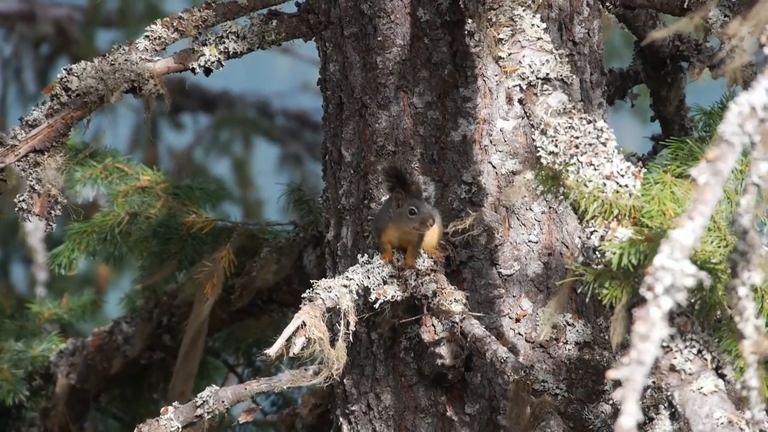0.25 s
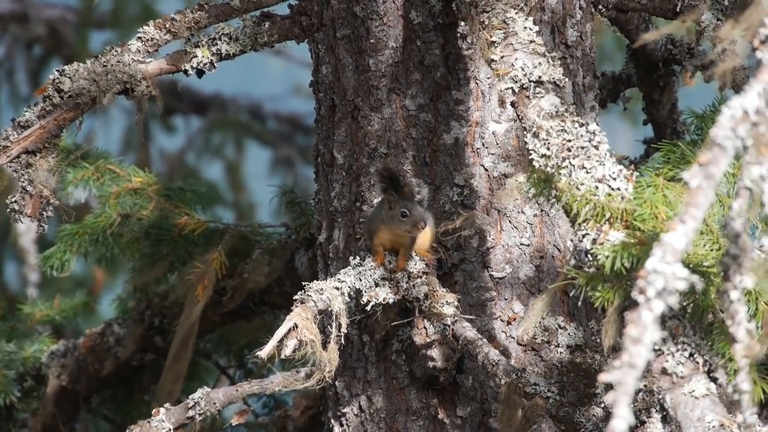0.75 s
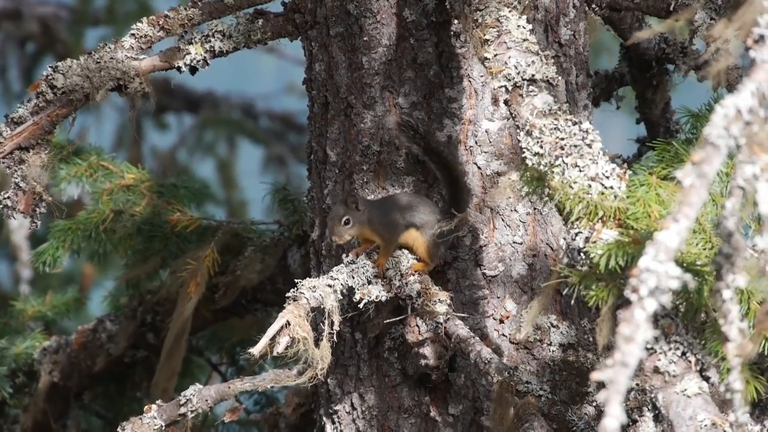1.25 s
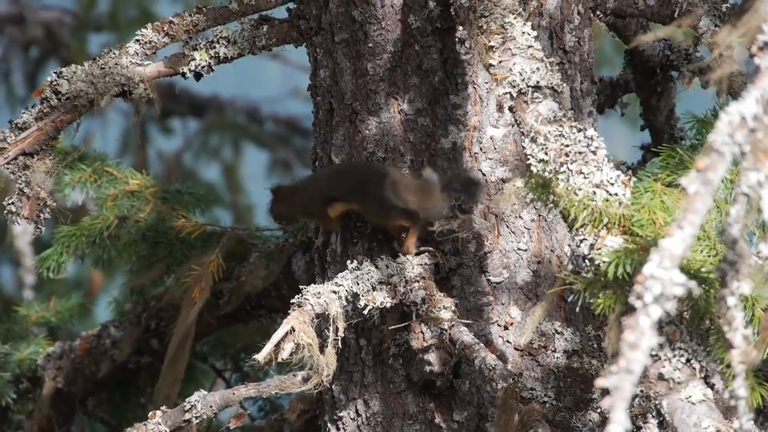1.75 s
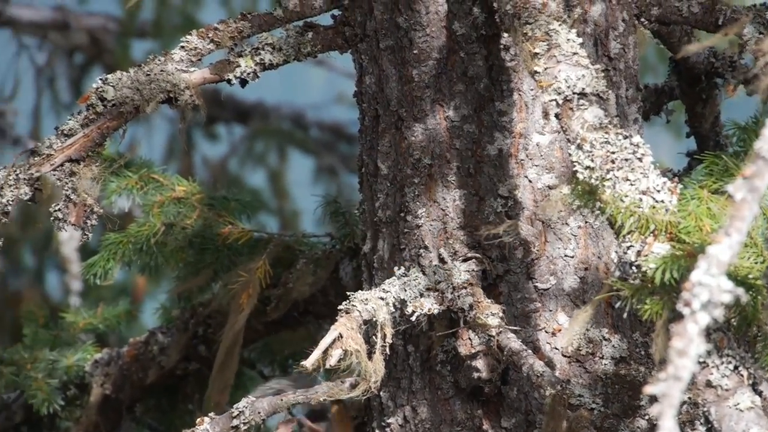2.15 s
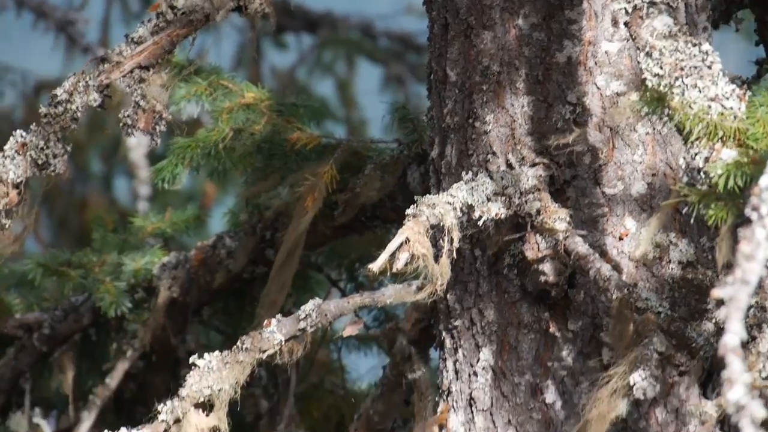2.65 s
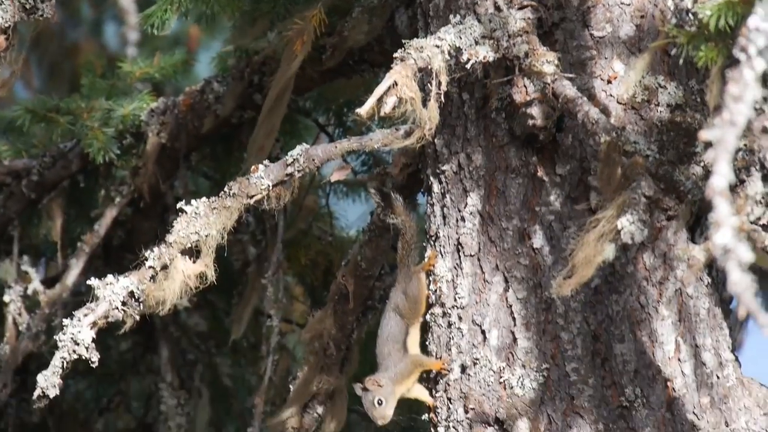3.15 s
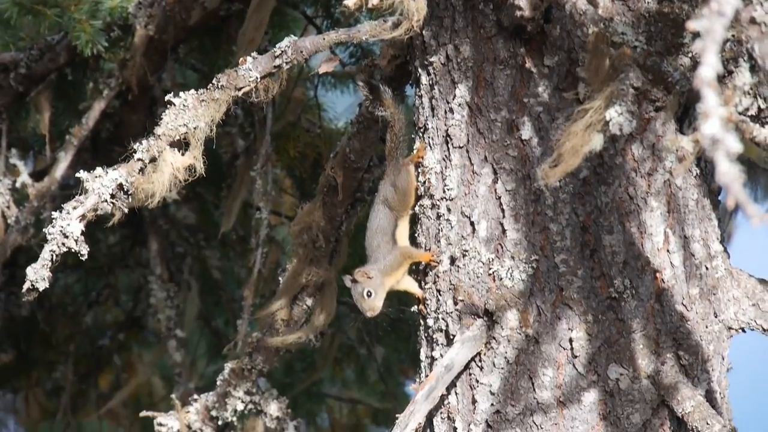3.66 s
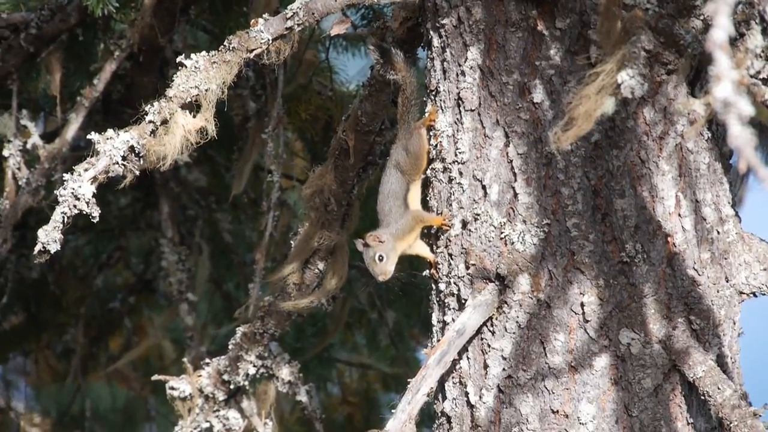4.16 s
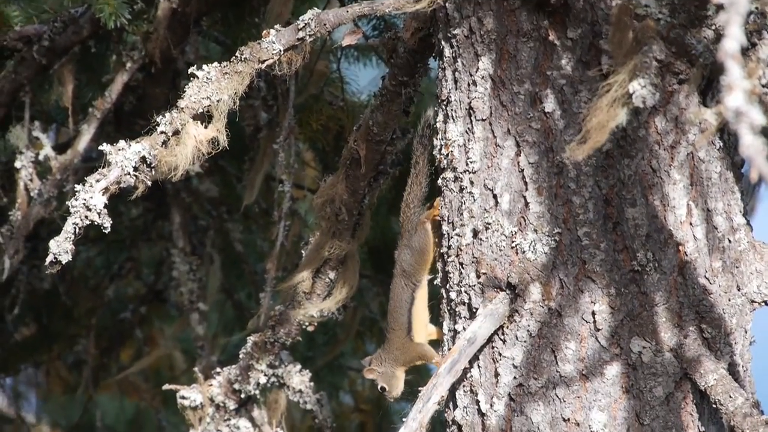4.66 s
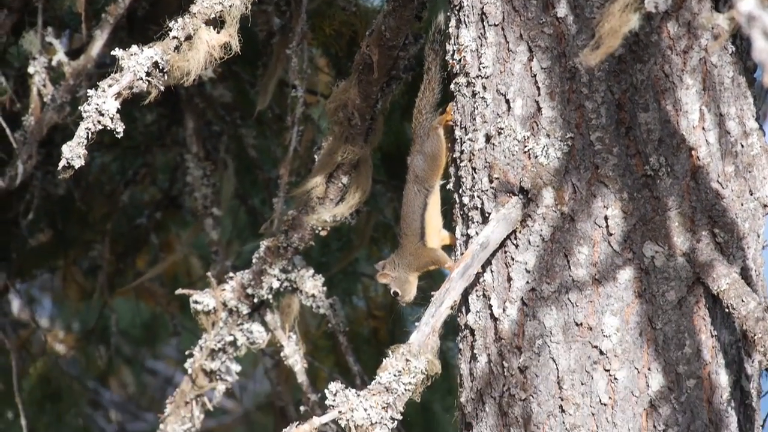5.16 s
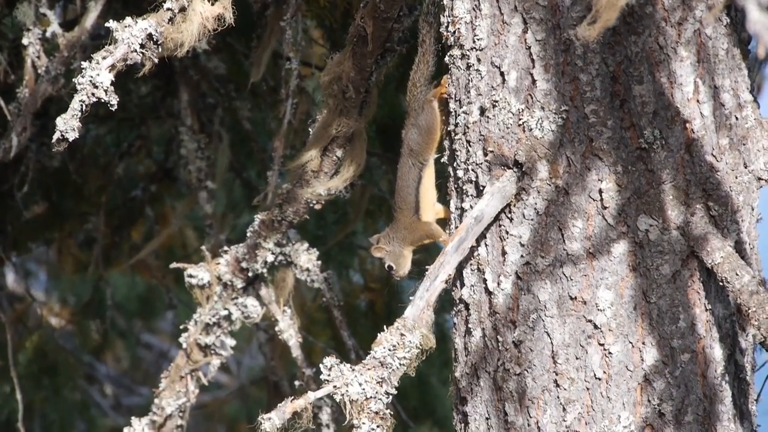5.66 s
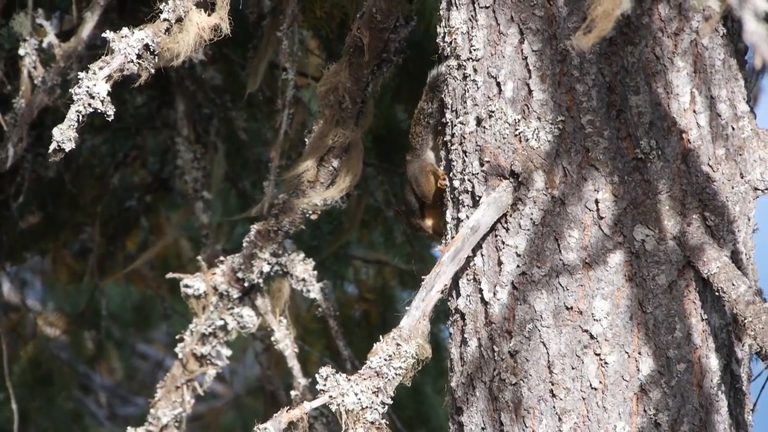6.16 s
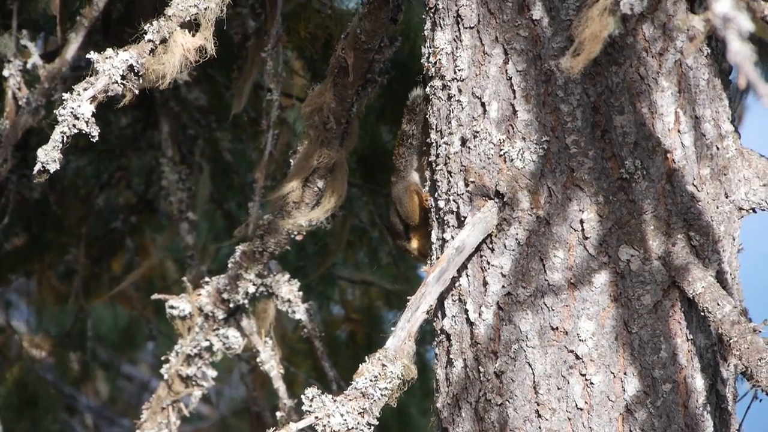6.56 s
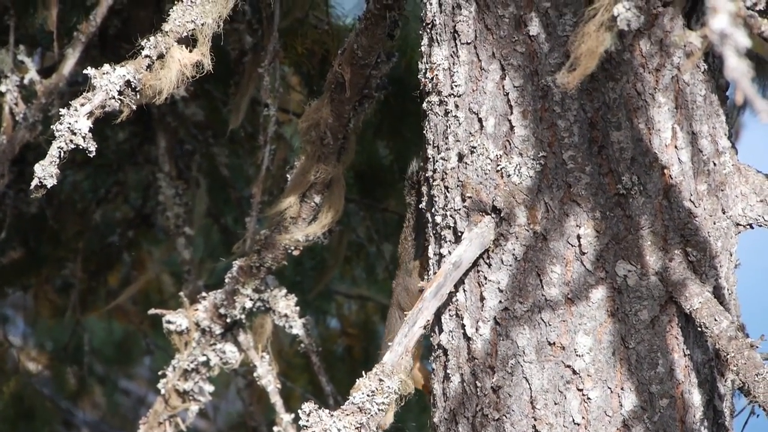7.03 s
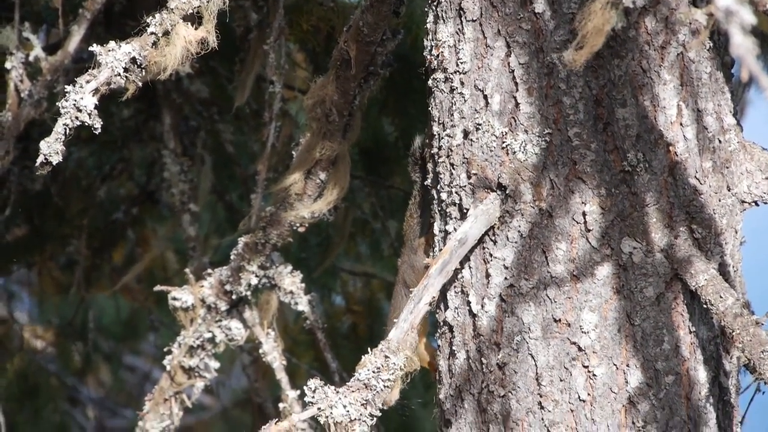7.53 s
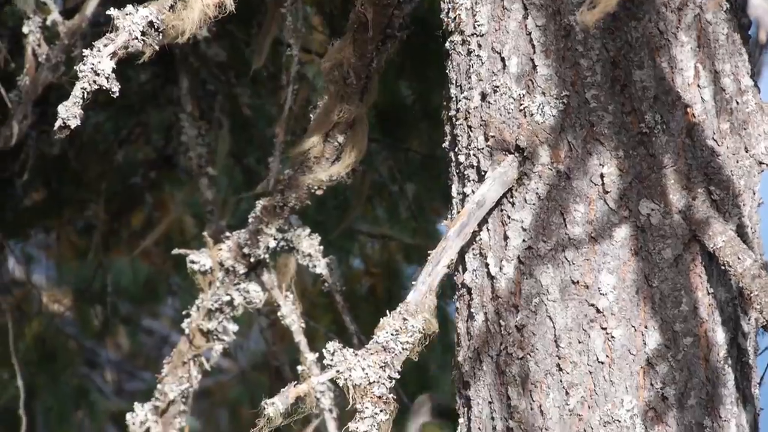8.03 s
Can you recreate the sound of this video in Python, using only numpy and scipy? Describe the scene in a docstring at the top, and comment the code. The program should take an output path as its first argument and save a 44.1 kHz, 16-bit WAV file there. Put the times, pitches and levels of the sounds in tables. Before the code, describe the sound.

A squirrel in a quiet forest gives seven short alarm whistles at uneven intervals. The first is soft and arched, the second a wavering squeal, the next four leap up sharply and slide down, and the last wavers again. Its claws scratch faintly on bark around the first two calls. Light wind buffets the microphone with low thumps, mostly on the right, over a faint steady rush of trees.

```python
"""A squirrel on a conifer trunk gives seven alarm whistles: one soft arch, two that waver at the top,
four that leap up, turn shrill and slide down. Its vocal folds make a nearly pure tone that gains
overtones, rasp and hiss when pressed. Its claws scratch the bark as it turns and jumps, and the trees
scatter a short echo. Eddies of light wind buffet the right microphone port, over the steady faint
rush of the forest."""
import sys
import numpy as np
from scipy import signal
from scipy.fft import rfft, irfft, next_fast_len
from scipy.io import wavfile
from scipy.ndimage import uniform_filter1d, map_coordinates

SR = 44100
rng = np.random.default_rng(int(sys.argv[2]) if len(sys.argv) > 2 else 0)


def wav_record(signal):
    """Record a signal, one row per channel, as 16-bit PCM in the file named by sys.argv[1]."""
    frames = np.transpose(np.atleast_2d(signal))
    bounded = np.clip(frames, -1, 1)
    # unit amplitude maps onto the largest positive 16-bit level
    quanta = np.round(bounded * 32767).astype(np.int16)
    wavfile.write(sys.argv[1], SR, quanta)


N = 365588
BAND_LIMIT_HZ = 15750


def amp(db):
    """Decibels to amplitude ratio."""
    return 10 ** (np.asarray(db) / 20)


def unit(x):
    """Scale to rms 1."""
    return x / np.sqrt(np.mean(x ** 2) + 1e-20)


def along(points, hz):
    """Interpolate (frequency [Hz], value) points on a logarithmic frequency axis."""
    frequencies, values = np.transpose(points)
    return np.interp(np.log(hz + 1), np.log(frequencies + 1), values)


def curves(rows, t):
    """Interpolate each column after the first at the times t."""
    times, *columns = np.transpose(rows)
    return [np.interp(t, times, column) for column in columns]


def wobble(rate, size):
    """Smooth random modulation, rate knots a second."""
    knots = rng.standard_normal(int(size * rate / SR) + 4)
    return map_coordinates(knots, [np.arange(size) * rate / SR])


def swell(t, centre, width):
    """A Gaussian envelope of peak 1."""
    return np.exp(-((t - centre) / width) ** 2 / 2)


def filtered(x, response):
    """Linear filtering: the spectrum of x times a frequency response."""
    size = x.shape[-1]
    padded = next_fast_len(size + 8192)
    return irfft(rfft(x, padded) * response(np.fft.rfftfreq(padded, 1 / SR)), padded)[..., :size]


def coloured(x, spectrum):
    """Filter x by (frequency [Hz], gain [dB]) points."""
    return filtered(x, lambda hz: amp(along(spectrum, hz)))


def noise(spectrum, size):
    """Noise of rms 1, shaped by (frequency [Hz], level [dB]) points."""
    return unit(coloured(rng.standard_normal(size), spectrum))


def add(track, s, sound):
    """Superpose a sound on the track at time s."""
    part = track[max(round(s * SR), 0):][:len(sound)]
    part += sound[:len(part)]


def forest_rush(level_db=-58, waver_db=.4):
    """Partly coherent noise: a steady rush with hollow resonances around 1 kHz."""
    # broad spectrum: (frequency [Hz], relative density [dB])
    spectrum = [(20, -14.5), (90, 4.5), (250, -3.5), (550, -4), (800, -1), (1200, -6.5), (1500, -8),
                (2500, -12), (3600, -11), (4400, -14), (5100, -14), (6500, -19), (10000, -23.5),
                (15500, -28)]
    # resonances: (centre [Hz], width [Hz], lift [dB])
    resonances = [(784, 33, 5.5), (910, 33, 7.5), (1130, 84, 12), (1272, 165, 9), (1947, 215, 5.5),
                  (2990, 520, 2.5)]
    # likeness of left and right: (frequency [Hz], correlation [0-1])
    likeness = [(60, 0.54), (300, 0.31), (600, 0.27), (850, 0.73), (1200, 0.66), (1600, 0.58), (3500, 0.59),
                (7000, 0.48), (15000, 0.2)]

    def mid_and_side(hz):
        lift = sum(db / (1 + (2 * (hz - centre) / width) ** 2) for centre, width, db in resonances)
        angle = np.arccos(along(likeness, hz)) / 2
        return amp(along(spectrum, hz) + lift) * [np.cos(angle), np.sin(angle)]

    mid, side = filtered(rng.standard_normal((2, N)), mid_and_side)
    balance = amp([[.6], [-.6]])  # slightly louder on the left
    return amp(level_db + waver_db * wobble(6, N)) * unit(np.array([mid + side, mid - side])) * balance


def wind(gust_db=1.3, right_db=7, left_db=-11, wake_db=-17, puff_db=5, brightening=1.18):
    """Turbulent pressure: eddies thump on the right port, and weaker ones on the left."""
    # wind strength: (time [s], relative level [dB])
    breeze = [(0.0, -64.5), (0.92, -61.5), (1.34, -81), (1.52, -47), (1.64, -67), (1.85, -43.5),
              (2.22, -70), (2.45, -45), (2.86, -51.5), (3.16, -47.5), (5.33, -60), (5.38, -58), (5.45, -69),
              (5.68, -53.5), (5.82, -67), (6.39, -61.5), (7.57, -60.5), (7.62, -47.5), (7.76, -55),
              (7.97, -44.5), (8.15, -50.5), (8.29, -47.5)]
    # single puffs on the port: (time [s], relative level [dB], frequency [Hz])
    puffs = [(0.724, -45.5, 172), (.83, -37, 169), (1.499, -38, 112), (1.784, -30.5, 156),
             (1.845, -31, 165), (1.888, -33, 175), (2.018, -36, 172), (2.485, -32.5, 165),
             (2.946, -33.5, 147), (3.17, -33, 180), (3.223, -30, 265), (3.6, -44, 171), (3.638, -29.5, 223),
             (3.791, -35.5, 146), (4, -40, 186), (4.064, -34.5, 200), (4.407, -38, 145),
             (4.805, -37.5, 144), (4.968, -37, 151), (5.04, -37, 141), (5.178, -41.5, 148),
             (5.239, -43.5, 127), (5.376, -33.5, 136), (5.66, -45.5, 150), (6.244, -39.5, 173),
             (6.502, -36.5, 300), (6.759, -36, 116), (7.295, -39.5, 180), (7.607, -31.5, 136),
             (7.875, -29, 132.6), (7.964, -33, 137)]
    # eddy spectrum: (frequency [Hz], relative level [dB])
    buffet = [(20, -33), (45, -29), (65, -12), (90, -1), (125, 3.5), (200, -2), (300, -12.5), (450, -25.5),
              (700, -39.5), (1500, -65), (4000, -100)]
    # inverted leak from the right port into the left: (frequency [Hz], gain [dB])
    crosstalk = [(60, -30), (150, -24), (220, -16), (320, -10), (500, -8), (900, -9)]
    now = np.arange(N) / SR
    breeze_db, = curves(breeze, now)
    gusts = amp(breeze_db - 2 + gust_db * wobble(16, N))
    wakes = sum(amp(db + wake_db) * swell(now, s, .025) for s, db, hz in puffs)
    strength_db = 20 * np.log10(np.hypot(gusts, wakes))
    # each lump of air hits hard and also shakes the port at higher frequencies
    lumps = wobble(70, N)
    eddies = noise(buffet, N) * amp(3.5 * lumps)
    small_eddies = filtered(eddies, lambda hz: hz ** 2 / (hz ** 2 + 280 ** 2))
    eddies += small_eddies * (amp(brightening * (strength_db + 55.5) + 3.1 * lumps) - 1)
    # over a tenth of a second the eddies carry the power of the wind
    power = uniform_filter1d(uniform_filter1d(eddies ** 2, SR // 12), SR // 25)
    right = amp(strength_db + right_db) * eddies / np.sqrt(np.abs(power))
    # a big puff sweeps the small eddies aside: one pressure swing, about a cycle long
    swept = np.max([np.exp(-((now - s) / .054) ** 2) for s, db, hz in puffs], axis=0)
    right *= 1.5 - .41 * swept
    t = np.arange(-SR // 50, SR // 50) / SR
    for s, db, hz in puffs:
        swing = rng.choice([-1, 1]) * np.sin(2 * np.pi * hz * t) * np.exp(-(t * hz / .57) ** 2)
        add(right, s + t[0] + .0047, amp(db + puff_db) * swing)
    left_colour = [(20, -25), (60, -14), (115, 13.5), (180, -7.5), (300, -2), (700, -32), (3000, -90)]
    left = amp(strength_db + left_db) * noise(left_colour, N) - coloured(right, crosstalk)
    return np.array([left, right])


def snap(centre_hz, t60, width_octaves):
    """A damped impact: a noise burst of peak 1, ringing broadly around one frequency."""
    t = np.arange(-SR // 500, SR // 20) / SR
    burst = rng.standard_normal(len(t)) * amp(-60 * t / t60) * (t > 0)
    resonance = lambda hz: 1 / (1 + (np.log2((hz + 1) / centre_hz) / width_octaves) ** 2)
    sound = filtered(burst, lambda hz: resonance(hz) / (1 + (hz / 12500) ** 12))
    return sound / np.abs(sound).max()


def claws_on_bark(claw_db=2, twig_db=4, scrape_db=-3):
    """Impact and friction: claws snap flakes of bark and twigs tick, amid a grainy scraping."""
    # claw strikes: (time [s], relative peak [dB], centre [Hz])
    claws = [(1.1194, -53, 7770), (1.1428, -51, 6990), (1.159, -51, 5610), (1.2516, -53, 10200),
             (1.4047, -55.5, 4180), (1.7054, -49, 10500), (1.714, -43.5, 6800), (1.746, -49, 5800),
             (1.8758, -44, 5600), (1.9235, -51, 8510), (1.9404, -42, 7990), (1.945, -42.5, 7950),
             (1.986, -51, 5680), (2.2493, -52, 4270), (6.296, -55.5, 5000), (6.7305, -46.5, 9800),
             (7.2789, -53, 4180)]
    # duller ticks of twigs: (time [s], relative peak [dB], centre [Hz])
    twigs = [(2.352, -54, 1970), (2.418, -49, 1910), (3.8555, -49, 2080)]
    # scraping movements: (time [s], relative level [dB], half-length [s])
    moves = [(1.128, -63, 0.037), (1.22, -71, .07), (1.738, -59, 0.04), (1.95, -62, 0.089),
             (2.296, -64, 0.068)]
    snaps = np.zeros(N)
    for s, db, centre_hz in claws:
        add(snaps, s - .002, amp(db + claw_db) * snap(centre_hz, t60=.027, width_octaves=.53))
    for s, db, centre_hz in twigs:
        add(snaps, s - .002, amp(db + twig_db) * snap(centre_hz, t60=.026, width_octaves=.47))
    effort = sum(amp(db) * swell(np.arange(N) / SR, s, width) for s, db, width in moves)
    friction = noise([(500, -11), (2000, -1), (6000, 2), (10500, 1), (13000, -7), (15500, -14)], N)
    grain = amp(6 * wobble(500, N) + 1.2 * wobble(59.96, N))
    return snaps + effort * amp(scrape_db) * unit(friction * grain)


def tree_echo(x, build_up_s=.0043):
    """Scattering: trunks and branches return a short tail whose treble dies first."""
    # reverberation: (frequency [Hz], time to fall 60 dB [s])
    t60 = [(300, 0.52), (2000, 0.32), (10000, 0.17)]
    hz, t, spectra = signal.stft(rng.standard_normal((2, SR // 2)), SR, nperseg=256)
    envelope = amp(-60 * t / along(t60, hz)[:, None]) * (1 - np.exp(-t / build_up_s))
    tail = signal.istft(spectra * envelope, SR, nperseg=256)[1]
    return signal.fftconvolve(x, tail / np.linalg.norm(tail[0]), axes=1)[:, :N]


def overtones(colour, pitch, phase):
    """Formant filtering: harmonics 3 to 16 share unit power by the resonances they pass through."""
    k = np.arange(3, 17)[:, None]
    share = amp(along(colour, k * pitch)) * (k * pitch < BAND_LIMIT_HZ)
    harmonics = share * np.sin(k * phase + rng.uniform(0, 2 * np.pi, k.shape))
    return np.sqrt(2) * np.sum(harmonics, axis=0) / np.linalg.norm(share, axis=0)


def whistle(t, pitch, level, octave, upper, flow, mouth_hz):
    """Source and filter: the folds give tone, rasp and hiss; throat and mouth colour the overtones."""
    # throat resonances: (frequency [Hz], relative level [dB])
    throat = [(2500, -19), (5500, 19), (6500, -7), (7500, -13), (8600, 3.5), (9600, -0.5), (10700, 3.5),
              (11800, -28), (13000, -12), (15500, -22)]
    # hiss spectrum, strongest near 10 kHz: (frequency [Hz], relative level [dB])
    hiss_colour = [(1200, -21), (2500, 2), (5000, -8), (8000, -6.5), (9500, 0.5), (10600, 6.5), (11400, -5),
                   (12400, -13), (15500, -18)]
    size = len(t)
    pitch = pitch * (1 + .0048 * wobble(403, size) + .0081 * wobble(2000, size))  # jitter
    phase = 2 * np.pi * np.cumsum(pitch) / SR
    octave = octave * amp(1.9 * wobble(140.6, size))
    fundamental = level * amp(1.5 * wobble(98.3, size))
    tone = np.sqrt(2) * (fundamental * np.sin(phase) + octave * np.sin(2 * phase))
    # the mouth opening favours one of the upper overtones
    tract = [(hz, db + 6 * np.exp(-((hz - mouth_hz) / 1000) ** 2)) for hz, db in throat]
    tone += upper * overtones(tract, pitch, phase)
    flutter = amp(1.46 * wobble(217.2, size)) * (1 + amp(-22) * wobble(1500, size))
    # pressed folds shed noise between the low harmonics
    rasp_colour = [(1000, -14), (2100, 11), (3000, -6), (4000, -7), (6000, -1.5), (11000, -18),
                   (15000, -28)]
    rasp = octave * amp(-16) * noise(rasp_colour, size)
    # air forced past the folds hisses, partly locked to the pitch; phase drift smears the harmonics
    smeared = overtones(hiss_colour, pitch, phase + .14 * wobble(900, size))
    breath = amp(1) * noise(hiss_colour, size)
    hiss = flow * unit((smeared + breath) * amp(1.7 * wobble(91, size)))
    edges = np.clip((t - t[0]) / .0014, 0, 1) * np.clip((t[-1] - t) / .00055, 0, 1)
    voicing = np.minimum(np.sqrt(level / amp(-43)), 1)
    return edges * (tone * flutter + rasp + hiss * voicing)


def soft_arch(length_s=.194, foot_hz=726, top_hz=1334, top_db=-43, fade_db=20):
    """Gentle phonation: pitch and level rise and fall together, never turning shrill."""
    t = np.arange(0, length_s, 1 / SR)
    off_top = np.abs(2 * t / length_s - 1)
    pitch = top_hz - (top_hz - foot_hz) * off_top ** 2
    level = amp(top_db - fade_db * off_top ** 3.6)
    octave = amp(-62) * swell(t, .13, .079)  # strongest just past the top
    flow = amp(-61.5) * swell(t, length_s / 2, length_s / 2)
    return whistle(t, pitch, level, octave, amp(-85), flow, mouth_hz=10500)


def squeal(contour, mouth_hz, hiss, shrill):
    """Frequency and amplitude modulation: a held call quavers as hiss and shrill overtones swell."""
    t = np.arange(contour[0][0], contour[-1][0], 1 / SR)
    surge = lambda s, db, width: amp(db) * swell(t, s, width)
    pitch, fundamental_db, octave_db = curves(contour, t)
    pitch *= 1 + .0103 * wobble(168.9, len(t))
    level = amp(fundamental_db + 2 * wobble(115, len(t)))
    upper = surge(*shrill) + amp(octave_db - 23)
    return whistle(t, pitch, level, amp(octave_db), upper, surge(*hiss), mouth_hz)


def voice_crack(db, decay_s):
    """A register break: the throat crackles as the voice enters or leaves its shrill register."""
    t = np.arange(SR // 8) / SR
    rasp = noise([(900, 4), (1700, -5), (2400, 3), (3200, -4), (6500, -7), (10800, -8), (13000, -13),
                  (15500, -28)], len(t))
    grain = amp(4 * wobble(630, len(t)))
    return amp(db) * unit(rasp * grain) * np.exp(-t / decay_s)


def falling_call(top_s, shrill_s, slide_s, top_hz, scoop, knee_hz, drop_s, sag_hz_per_s,
                 shrill_db, slide_db, octave_db, upper_db, hiss_db, mouth_hz):
    """A glide across registers: the pitch leaps to a shrill top, drops and sags away as a purer tone."""
    leap_from_hz, leap_s, onset_s = 950, .0125, .012
    hold_share, fade_db, upper_fall_db_per_s = .41, 28.5, 150
    t = np.arange(0, top_s + slide_s, 1 / SR)
    sliding = np.maximum(t - top_s, 0)
    glide = knee_hz + (top_hz - knee_hz) * np.exp(-sliding / drop_s) - sag_hz_per_s * sliding
    leap = (top_hz - leap_from_hz) * np.maximum(1 - t / leap_s, 0)
    dip = scoop * top_hz * swell(t, .0265, .012)
    final_droop = 180 * np.exp((t - t[-1]) / .018)
    pitch = (glide - leap - dip - final_droop) * (1 + .009 * wobble(71.3, len(t)))
    # the leap is a short chirp; then one push of effort makes the shrill part
    chirp = amp(-2.5) * swell(t, .0072, .0025)
    push = np.abs(np.sin(np.pi * np.clip((t - onset_s) / (shrill_s - onset_s), 0, 1)))
    shrill = amp(shrill_db) * (push ** .44 + chirp)
    # the slide swells, holds, then fades and breaks up as the air runs out
    fading = np.maximum(sliding / slide_s - hold_share, 0) / (1 - hold_share)
    ragged = amp(4 * fading * wobble(130, len(t)))
    slide = ragged * amp(slide_db - fade_db * fading) * np.clip(sliding / .013, .3, 1)
    late_octave = ragged * amp(-63.5) * swell(t, top_s + .58 * slide_s, .033)
    octave = amp(octave_db) * push ** 1.2 + late_octave
    # the upper overtones switch on as the leap ends and ebb away
    register = np.clip((t - onset_s) / .0047, 0, 1) * np.clip((top_s - t) / .016 + .5, 0, 1)
    upper = amp(upper_db - upper_fall_db_per_s * (t - onset_s)) * register
    flow = amp(hiss_db) * swell(t, top_s + .37 * slide_s, .1)
    return whistle(t, pitch, np.hypot(shrill, slide), octave, upper, flow, mouth_hz)


def alarm_calls():
    """Superposition: the seven calls and the cracks of the voice add into one signal."""
    # squeal at the jump: (time [s], pitch [Hz], fundamental [dB], octave [dB])
    jump_squeal = [(1.905, 1840, -58, -73), (1.923, 1773, -51.5, -87), (1.939, 1602, -55, -63),
                   (1.957, 1808, -46, -78), (1.975, 1770, -54, -86), (1.995, 1901, -48.5, -68),
                   (2.035, 1785, -48.5, -78), (2.057, 1818, -55, -65), (2.091, 1875, -40, -63),
                   (2.115, 1996, -41.5, -62), (2.123, 1955, -39, -81), (2.139, 1808, -39, -50.5),
                   (2.195, 1847, -43.5, -52.5), (2.21, 1831, -78, -77)]
    # closing squeal: (time [s], pitch [Hz], fundamental [dB], octave [dB])
    long_squeal = [(7.94, 1310, -35.5, -72), (7.946, 1820, -46, -75), (7.95, 1985, -44, -81),
                   (7.956, 2088, -38, -59), (7.976, 2133, -39, -42.5), (7.988, 2120, -42, -65),
                   (8.01, 2044, -49, -73), (8.022, 1846, -36, -78), (8.036, 1794, -44.5, -72),
                   (8.07, 1810, -45.5, -67), (8.084, 1690, -46, -68), (8.112, 1786, -48.5, -77),
                   (8.142, 1710, -53, -66), (8.192, 1830, -44.5, -48.5), (8.242, 1937, -41, -45.5),
                   (8.289, 1850, -45, -53.5)]
    # register breaks: (time [s], level [dB], decay time [s])
    cracks = [(2.128, -54, .035), (2.686, -60, .015), (4.424, -46, .003), (4.479, -53, .035),
              (5.936, -52, .003), (6.858, -51, .005), (6.926, -54, .022), (7.954, -51, .003)]
    # falling calls: (start [s], time at the top [s], end of the push [s], slide length [s], top [Hz],
    # scoop [share of top], knee [Hz], drop time [s], sag [Hz/s], shrill part [dB], slide [dB],
    # octave [dB], upper overtones [dB], hiss [dB], mouth resonance [Hz])
    falls = [(2.605, .065, 0.047, 0.21, 2060, .06, 1598, 0.019, 4295, -39, -40.5, -75, -62, -64.5, 5700),
             (4.41, .058, 0.057, 0.2, 2205, 0.042, 1498, 0.046, 4150, -34, -40, -41.5, -43.5, -64, 9900),
             (5.928, 0.053, 0.048, 0.17, 2237, 0.046, 1261, 0.03, 1993, -40, -44.5, -47.5, -48, -67.5, 8500),
             (6.846, .051, 0.07, 0.22, 2162, .075, 1564, 0.018, 3510, -37, -37.5, -47, -48.5, -61, 6960)]
    voice = np.zeros(N)
    add(voice, 1.213, soft_arch())
    for s, *manner in falls:
        add(voice, s, falling_call(*manner))
    # hiss and shrill: (time [s], level [dB], half-length [s])
    add(voice, jump_squeal[0][0],
        squeal(jump_squeal, mouth_hz=10500, hiss=(2.125, -59.5, .092), shrill=(2.12, -78, .041)))
    add(voice, long_squeal[0][0],
        squeal(long_squeal, mouth_hz=6100, hiss=(7.68, -65, .44), shrill=(7.968, -55, .016)))
    for s, db, decay_s in cracks:
        add(voice, s, voice_crack(db, decay_s))
    return voice


def port_response(hz):
    """Level and phase differences: the camera body colours and shifts the calls at each port."""
    # (frequency [Hz], left over right [dB])
    lean = [(1200, 1.5), (2000, -.7), (3400, -3), (4250, 9.5), (5200, 0), (8600, .5), (10700, -1)]
    # (frequency [Hz], phase lead of the left [rad])
    lead = [(900, .1), (1300, .15), (2100, .23), (3000, .14), (4250, .62), (9000, .64)]
    left_gain = 2 / (1 + amp(-along(lean, hz)))
    shift = np.exp(.5j * along(lead, hz))
    return np.array([left_gain * shift, (2 - left_gain) / shift])


def scuffs(gain_db=-10.5, rise_s=.006):
    """Noise transients: a few faint dry scuffs rise quickly and decay exponentially."""
    # soft scuffs: (time [s], relative level [dB])
    events = [(5.441, -40), (7.504, -42.5), (7.542, -42.5)]
    colour = [(300, -27), (680, 10.5), (1100, 9), (1800, -17), (3200, .5), (5000, -28), (15000, -30)]
    out, t = np.zeros(N), np.arange(SR // 12) / SR
    envelope = t / rise_s * np.exp(1 - t / rise_s)
    for s, db in events:
        add(out, s - rise_s, amp(db + gain_db) * noise(colour, len(t)) * envelope)
    return out


def scene(echo_db=-16):
    """Direct and scattered sound of the squirrel add to the scuffs, the wind and the forest."""
    squirrel = filtered(alarm_calls(), port_response) + claws_on_bark()
    return squirrel + amp(echo_db) * tree_echo(squirrel) + scuffs() + wind() + forest_rush()


def record(dry):
    """An ideal low-pass filter: nothing above the band limit passes."""
    return filtered(dry, lambda hz: hz < BAND_LIMIT_HZ)


dry = scene()
out = record(dry)
wav_record(out)
```